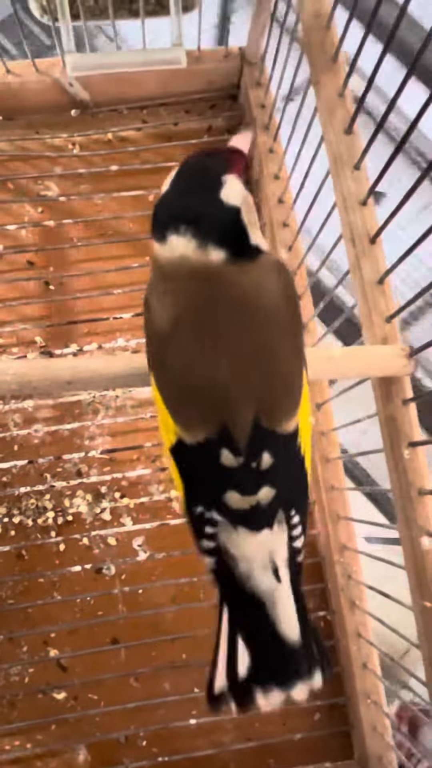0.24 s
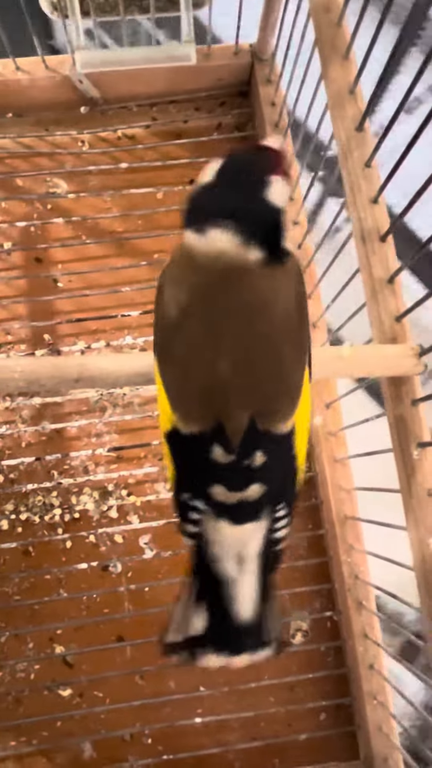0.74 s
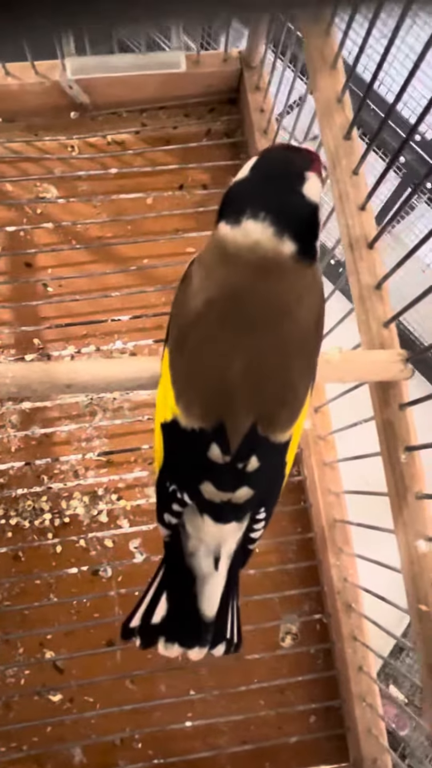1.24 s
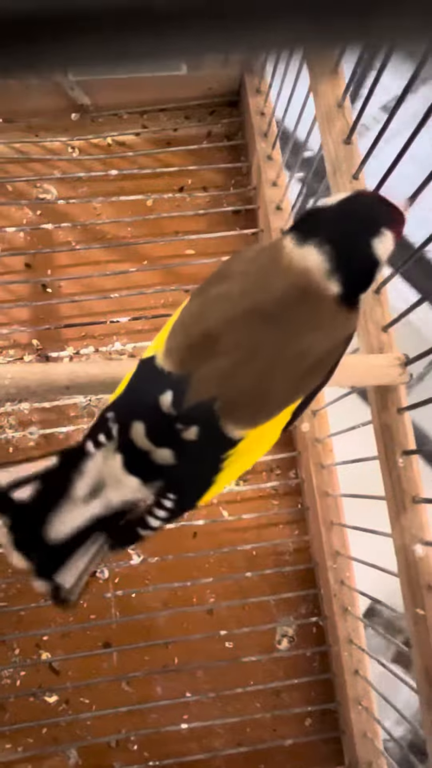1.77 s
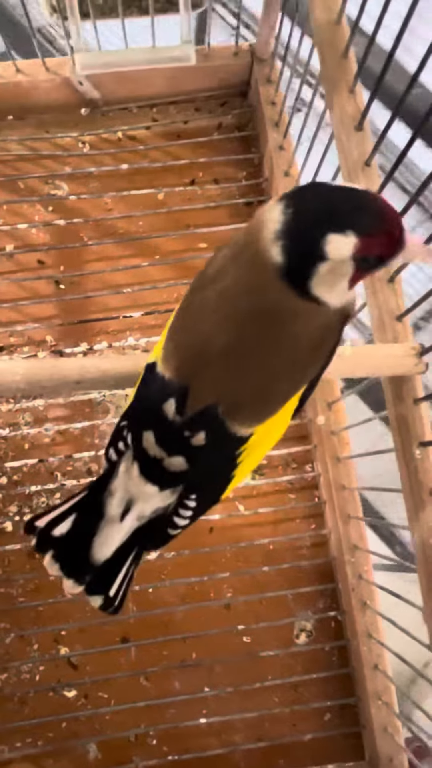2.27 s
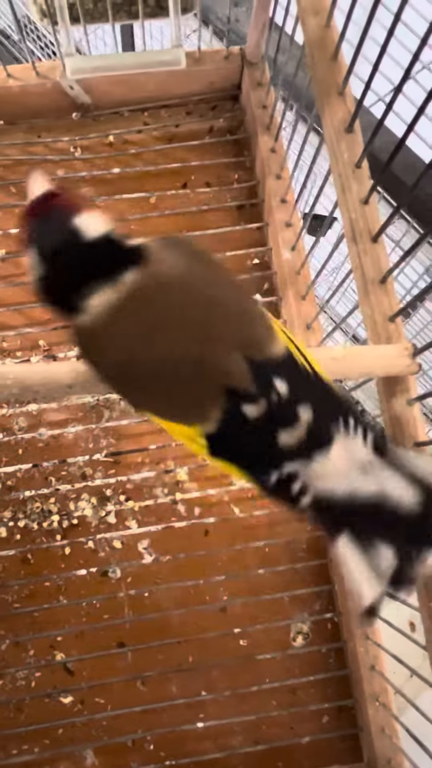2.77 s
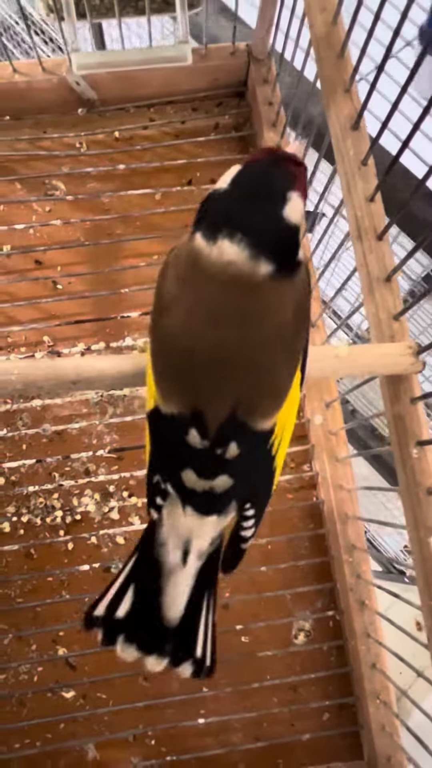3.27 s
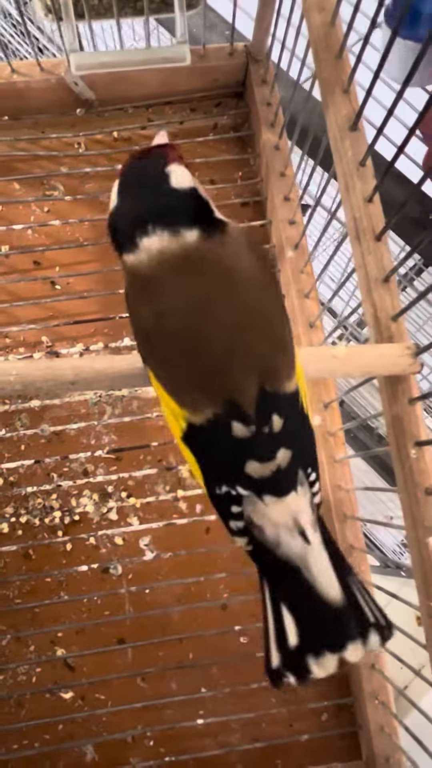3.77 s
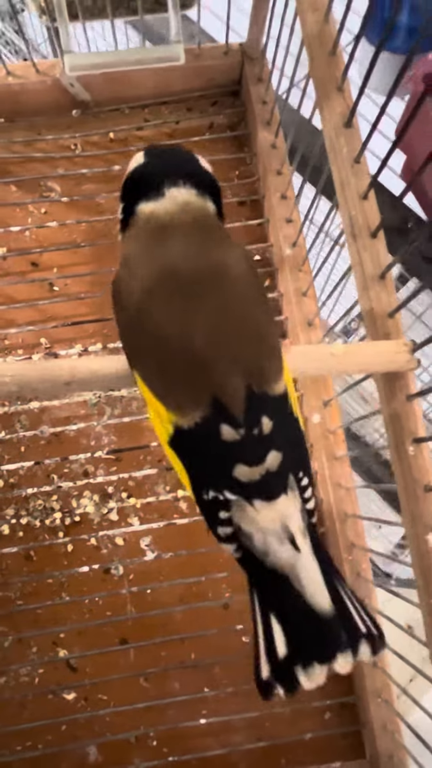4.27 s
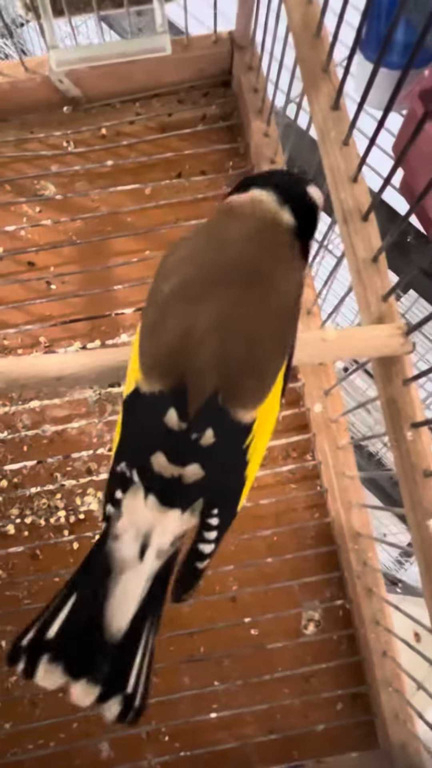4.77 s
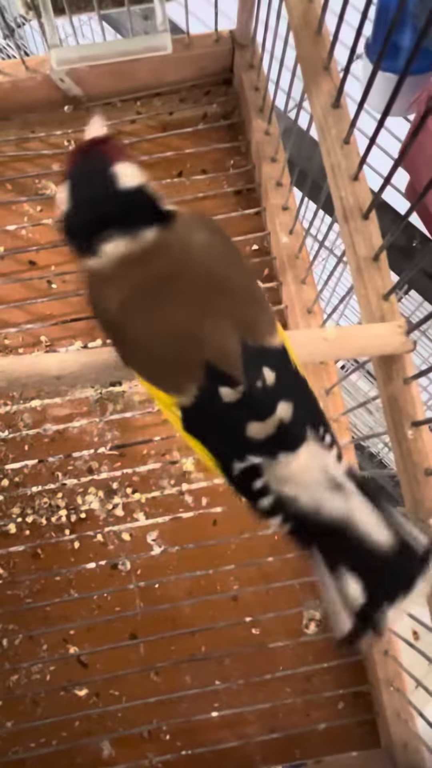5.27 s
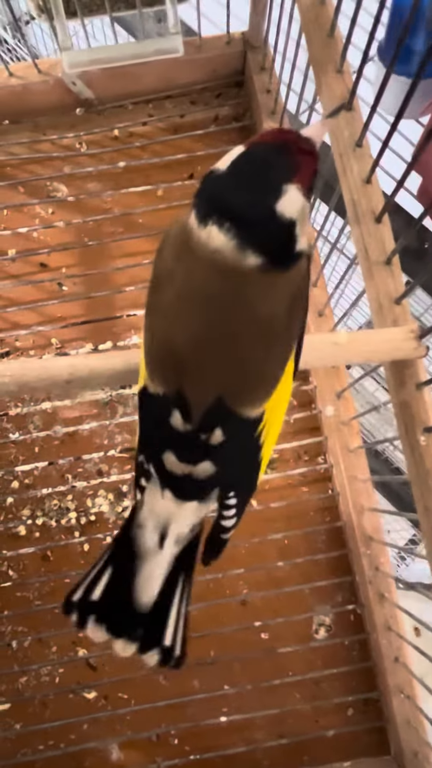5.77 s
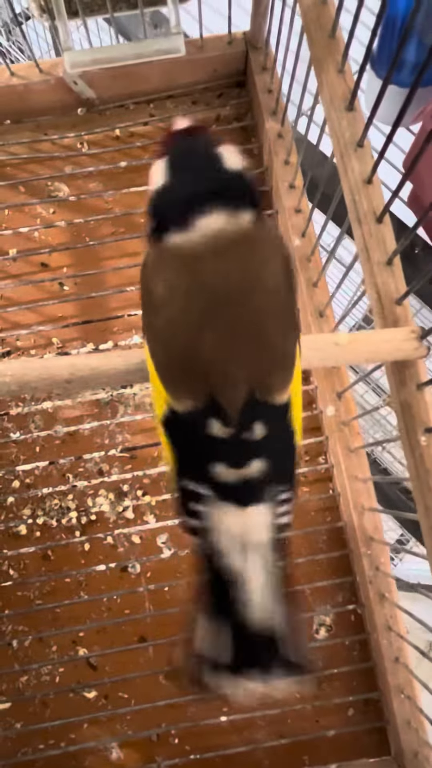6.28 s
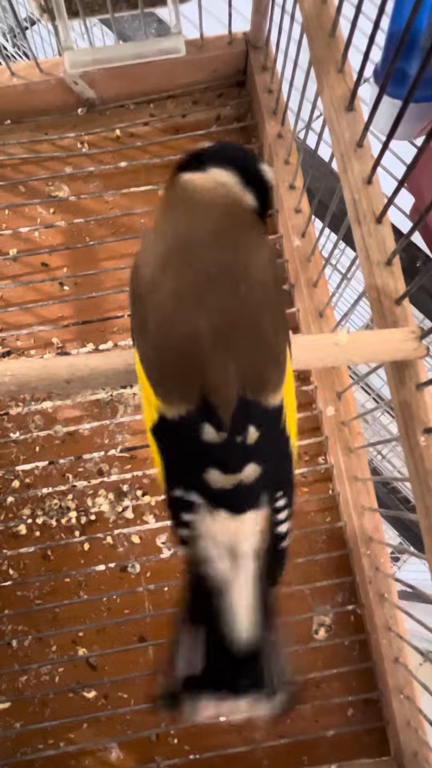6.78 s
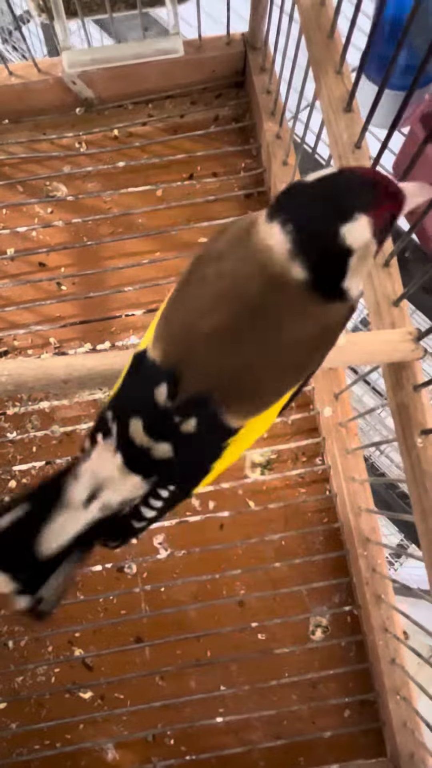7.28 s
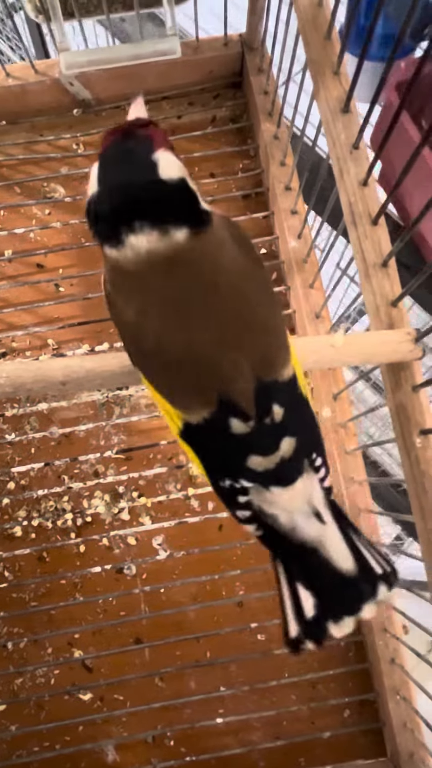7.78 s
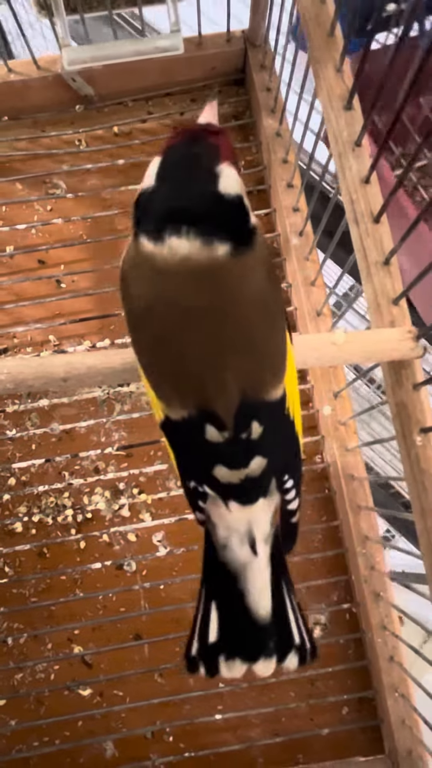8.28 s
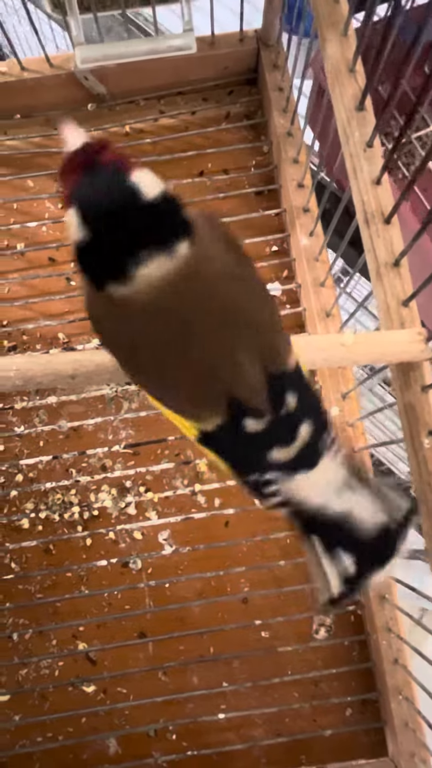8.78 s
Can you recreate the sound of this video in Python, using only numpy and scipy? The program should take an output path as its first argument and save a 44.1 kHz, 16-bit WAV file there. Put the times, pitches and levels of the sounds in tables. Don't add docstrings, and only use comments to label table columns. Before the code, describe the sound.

Near stereo phone pickup of a caged songbird: rapid rising and falling chirps first, then five separate calls, each two clicks, a buzzy rasp and a held pure whistle. Distant finches answer constantly with washed-out chirps, a warble, a fast trill and a fading rattle mid-way. The cage knocks dully a few times; low rumble and faint motor hum continue underneath.

```python
import sys
import numpy as np
from scipy import signal
from scipy.fft import rfft, irfft, next_fast_len
from scipy.io import wavfile
from scipy.ndimage import uniform_filter1d, map_coordinates

SR = 44100
rng = np.random.default_rng(int(sys.argv[2]) if len(sys.argv) > 2 else 0)


def transcribe(signal):
    frames = np.atleast_2d(signal).T
    limited = np.clip(frames, -1, 1)
    pcm = np.round(limited * 32767).astype(np.int16)
    wavfile.write(sys.argv[1], SR, pcm)


def volts_from_decibels(level):
    exponent = np.asarray(level, float) / 20
    return 10 ** exponent


N = 397782
T = np.arange(N) / SR
SIZE = next_fast_len(N + SR // 10)
HZ = np.fft.rfftfreq(SIZE, 1 / SR)


def shaped(x, gain):
    return irfft(rfft(x, SIZE) * gain, SIZE)[..., :N]


def over_hz(table):
    hz, value = np.transpose(table)
    return np.interp(np.log(HZ + 1), np.log(hz), value)


def over_time(table):
    return np.interp(T, *np.transpose(table))


def add(out, t0_s, x):
    i = int(t0_s * SR)
    x = x[max(-i, 0):N - i]
    start = max(i, 0)
    out[start:start + len(x)] += x


# f/Hz, density/dB per Hz
RUMBLE_SPECTRUM = [(18, -49), (30, -8.5), (54, -1), (86, 1.5), (258, -15), (312, -9.5), (365, -15.5),
                   (574, -19), (826, -19.5), (1900, -28.5), (2470, -44), (4180, -120)]
# f/Hz, likeness/0-1
RUMBLE_LIKENESS = [(40, 1), (70, 1), (130, 0.97), (290, 0.94), (640, .3), (1400, 0.7)]
# t/s, level/dB
ROOM_LEVEL = [(0, -47.5), (.9, -61.5), (1.5, -57.5), (1.55, -68.5), (1.83, -61.5), (1.88, -52),
              (2.6, -58.5), (3.2, -60), (5.2, -62.5), (5.5, -64.5), (6.3, -61.5), (6.4, -56.5),
              (7.4, -53.5), (7.46, -66), (7.7, -62.5), (7.9, -55), (8.2, -58), (9.02, -58)]
# t/s, half length/s, level/dB
SWELLS = [
    (1.68, 0.145, -11.5),
    (7.95, 0.27, 9),
    (5.95, 0.48, 6.5),
]


def rumble():
    like = over_hz(RUMBLE_LIKENESS)
    spectrum = volts_from_decibels(over_hz(RUMBLE_SPECTRUM)) * (HZ > 28)
    mid = shaped(rng.standard_normal(N), spectrum * np.sqrt(1 + like))
    side = shaped(rng.standard_normal(N), spectrum * np.sqrt(1 - like))
    pair = np.array([mid + side, mid - side])
    low = shaped(pair, 1 / (1 + (HZ / 170) ** 4))
    high = pair - low
    high_db = over_time(ROOM_LEVEL)
    low_db = -57.5 + 0.59 * (high_db + 62)
    for t0_s, half_s, db in SWELLS:
        low_db = low_db + db * np.exp(-((T - t0_s) / half_s) ** 4)
    return low / np.std(low) * volts_from_decibels(low_db) + high / np.std(high) * volts_from_decibels(high_db)


# t/s, level/dB
MOTOR_LEVEL = [(0, -49.5), (1.5, -52), (1.6, -72), (9.02, -61)]
# f/Hz, level/dB
HUM_LINES = [(38, -58), (216, -67.5), (312, -70), (430, -71)]


def motor():
    out = volts_from_decibels(over_time(MOTOR_LEVEL)) * np.sin(2 * np.pi * 87.5 * T)
    for hz, db in HUM_LINES:
        sway_db = 2.3 * np.interp(T, np.linspace(0, N / SR, 16), rng.standard_normal(16))
        out = out + volts_from_decibels(db + sway_db) * np.sin(2 * np.pi * hz * T)
    return out * volts_from_decibels([[-1.5], [1.5]])


def hum():
    return rumble() + motor() + volts_from_decibels(-90) * rng.standard_normal((2, N))


# t/s, crack level/dB, crack f/Hz, thud level/dB
KNOCKS = [
    (0.577, -69, 204, -48.5),
    (4.349, -57, 686, -54),
    (5.658, -44, 540, -35),
    (5.925, -51, 533, -74),
    (6.142, -62.5, 876, -65),
    (7.873, -44.5, 540, -53),
]


def knocks():
    out = np.zeros(N)
    t = np.arange(int(.15 * SR)) / SR
    thud = np.sin(2 * np.pi * 66 * t) * (t / 0.0045) * np.exp(1 - t / 0.011)
    for t0_s, crack_db, crack_hz, thud_db in KNOCKS:
        band = signal.butter(2, [.5 * crack_hz, 1.5 * crack_hz], "bandpass", fs=SR, output="sos")
        crack = signal.sosfilt(band, rng.standard_normal(len(t)) * np.exp(-t / 0.0052))
        add(out, t0_s, volts_from_decibels(crack_db + 21) * crack)
        add(out, t0_s + 0.0097, volts_from_decibels(thud_db) * thud)
    return out


def sing(hz, gain, overtones_db, rough):
    flutter = rng.standard_normal((2, len(hz)))
    flutter = uniform_filter1d(uniform_filter1d(flutter, size=40), size=40) * np.sqrt(60)
    phase = 2 * np.pi * np.cumsum(hz * (1 + 0.22 * rough * flutter[0])) / SR
    tone = 0
    for k, db in enumerate(overtones_db, start=1):
        tone = tone + volts_from_decibels(db) * np.sin(k * phase) * (k * hz < .45 * SR)
    return np.sqrt(2) * gain * (1 + rough * flutter[1]) * tone


def glide(out, t0_s, length_s, pitches_hz, db, overtones_db, rough, swell):
    u = np.linspace(0, 1, int(length_s * SR))
    hz = np.interp(u, np.linspace(0, 1, len(pitches_hz)), pitches_hz)
    add(out, t0_s, sing(hz, volts_from_decibels(db) * np.abs(np.sin(np.pi * u)) ** swell, overtones_db, rough))


# f/Hz, T60/s
ROOM_T60 = [(500, 1.6), (3000, 1.5), (5000, 0.95), (8000, 1.15), (13000, 5.2)]


def echoes(build_s):
    t = np.arange(int(1.6 * SR)) / SR
    hz, t60_s = np.transpose(ROOM_T60)
    out = 0
    for centre in 700 * 2 ** np.arange(0, 4.6, .5):
        band = signal.butter(2, [centre / 2 ** .25, centre * 2 ** .25], "bandpass", fs=SR, output="sos")
        decay = volts_from_decibels(-60 * t / np.interp(centre, hz, t60_s))
        noise = signal.sosfilt(band, rng.standard_normal((2, len(t))))
        out = out + noise * decay / np.sqrt(centre * np.mean(decay ** 2))
    lumps = np.repeat(rng.exponential(size=(2, len(t) // 128 + 1)), 128, axis=1)[:, :len(t)]
    lumps = uniform_filter1d(lumps, size=128)
    out = out * (1 - np.exp(-t / build_s)) * (1 + 0.6 * lumps * np.exp(-t / 0.082))
    return out / np.sqrt(np.mean(np.sum(out ** 2, axis=1))) * 0.34


def in_room(x, response):
    return signal.oaconvolve(x[None], response, axes=1)[:, :N]


FAR_OVERTONES_DB = [-1, -26, -28]


def far_note(cage, t0_s, length_s, pitches_hz, db):
    glide(cage, t0_s, length_s, pitches_hz, db, FAR_OVERTONES_DB, rough=.04, swell=.8)


# t/s, level/dB
CHATTER = [(0, -51), (.3, -75.5), (1.9, -66.5), (2.6, -67), (2.85, -59), (3.6, -52), (4.2, -61.5),
           (5.2, -51.5), (5.7, -54.5), (6.1, -70), (6.55, -54), (7, -58), (7.35, -60), (7.6, -59.5),
           (8.3, -55.5), (9.02, -64.5)]


def chatter(cage):
    for t0_s, chance in zip(np.arange(0, N / SR, 1 / 32), rng.random((288, 3))):
        hz = 2250 + 800 * chance[0] ** .5
        pitches_hz = [hz, hz * (0.98 + 0.14 * chance[1])]
        db = np.interp(t0_s + 0.22, *np.transpose(CHATTER)) + 20.5 + 4 * chance[2]
        glide(cage, t0_s, 0.023, pitches_hz, db, FAR_OVERTONES_DB, rough=0.22, swell=0.62)


# t/s into the motif, length/s, start f/Hz, end f/Hz, level/dB
WARBLE = [(0, 0.063, 4360, 5380, -40.5), (.012, .012, 4200, 4400, -37.5), (.035, 0.021, 5800, 5410, -45),
          (.042, 0.018, 6480, 6610, -38), (.069, 0.039, 4550, 3555, -42), (.114, .025, 4600, 4276, -37),
          (.14, .04, 3600, 2800, -45), (.164, 0.0095, 4420, 4420, -35.5), (.174, 0.031, 3200, 4280, -52.5)]
TRILL = [
    (0.0025, 0.024, 4300, 5350, -39),
    (0.039, 0.018, 4750, 6080, -38),
    (0.087, .016, 4056, 3400, -40.5),
    (0.053, .012, 5600, 4900, -43.5),
]
RATTLE = [
    (0, 0.016, 4894, 4137, -38),
    (.03, 0.029, 5610, 4660, -49),
]
FLOURISH = [
    (0, 0.0056, 7000, 5860, -39),
    (.012, 0.021, 5720, 4520, -38),
    (.035, .028, 3460, 2930, -46),
]
# motif, repeats, first t/s, period/s, level change/dB per repeat
SONG = [
    (WARBLE, dict(count=3), 3.085, .199, 0.067),
    (TRILL, dict(count=8), 3.68, .097, 0.14),
    (RATTLE, dict(count=9), 4.49, 0.066, -0.32),
    (FLOURISH, dict(count=2), 8.378, 0.14, -0.12),
]


def neighbour_song(cage):
    for motif, repeats, first_s, period_s, fade_db in SONG:
        for k in range(repeats["count"]):
            for s, length_s, hz0, hz1, db in motif:
                level_chance, pitch_chance = rng.standard_normal(2)
                db = db + k * fade_db + .7 * level_chance + 26
                pitches_hz = np.array([hz0, hz1]) * (1 + .008 * pitch_chance)
                far_note(cage, first_s + k * period_s + s, length_s, pitches_hz, db)


# t/s, start f/Hz, end f/Hz, level/dB
LOW_CALLS = [(0.856, 2680, 2670, -65.5), (0.989, 3150, 3100, -62.5), (1.316, 2938, 3700, -46),
             (1.938, 3320, 3310, -42), (1.952, 3430, 2890, -50), (2.098, 3753, 3196, -43.5),
             (2.222, 2686, 3600, -47.5), (2.239, 3315, 3230, -42.5), (2.734, 3475, 3240, -45),
             (2.961, 3960, 3230, -45), (3.032, 3284, 2770, -52), (3.872, 3570, 2780, -43),
             (3.76, 3703, 3930, -45), (2.78, 2630, 1816, -61), (4.195, 2090, 3350, -67),
             (4.34, 3180, 4470, -47.5), (4.442, 3456, 2530, -49), (4.775, 3300, 3150, -51),
             (4.838, 3990, 3340, -48), (5.429, 3427, 2740, -50.5), (5.629, 3660, 2930, -57),
             (6.176, 3280, 2880, -57), (6.532, 3474, 2670, -55), (6.632, 2560, 3880, -46),
             (7.593, 3870, 3005, -47.5), (8.035, 2680, 3950, -48), (8.274, 3162, 2350, -49),
             (8.376, 4160, 2790, -50.5), (8.55, 3063, 2420, -51.5)]
HIGH_CALLS = [(0, 6010, 4880, -44), (.454, 5214, 4870, -40), (1.494, 4670, 5200, -48),
              (1.671, 5430, 5060, -61.5), (1.886, 5790, 4890, -42), (2.156, 4700, 5086, -39),
              (2.875, 6260, 4700, -44.5), (2.885, 5900, 6450, -49.5), (3.67, 6620, 6700, -73),
              (3.939, 6420, 6170, -55), (4.246, 7900, 6280, -55.5), (4.262, 6510, 6000, -50.5),
              (4.535, 6790, 6100, -50.5), (4.587, 7090, 6760, -53.5), (5.254, 6390, 6600, -48),
              (5.337, 8500, 6970, -55.5), (5.351, 5990, 4280, -45), (5.373, 7050, 6230, -52.5),
              (5.688, 6060, 5330, -52), (5.7, 5480, 5130, -47), (6.028, 6310, 5830, -47.5),
              (6.415, 6915, 6540, -48.5), (6.789, 5910, 4660, -64), (7.131, 4580, 6060, -39.5),
              (7.177, 6230, 5350, -48.5), (7.539, 4970, 5530, -55.5), (7.655, 5660, 5270, -45.5),
              (8.201, 5510, 7280, -60.5), (8.365, 7950, 6800, -54)]
MIDDLE_CALLS = [(0, 3736, 5670, -39.5), (.422, 4605, 4960, -39), (1.075, 4016, 4640, -50),
                (1.703, 3700, 4340, -44.5), (1.805, 4733, 4184, -42.5), (1.853, 3623, 4700, -41.5),
                (1.902, 4630, 4020, -46.5), (2.13, 3820, 4220, -42), (3.024, 3830, 4320, -52),
                (3.942, 3430, 5050, -39.5), (4.99, 4154, 4440, -41), (5.751, 4136, 3950, -46.5),
                (5.764, 4200, 4880, -43), (5.791, 4510, 4740, -55), (5.985, 3943, 4630, -46),
                (6.084, 4990, 4610, -39.5), (6.093, 3940, 4580, -50.5), (6.303, 4500, 3560, -44.5),
                (6.323, 3230, 4290, -45.5), (6.425, 4115, 3020, -47.5), (6.529, 4405, 3740, -47.5),
                (7.114, 4313, 4460, -40.5), (7.686, 5040, 4525, -41.5), (7.739, 3810, 3896, -41.5),
                (7.86, 3110, 4270, -46.5), (8.059, 3296, 4310, -49.5), (8.177, 4235, 3330, -46.5),
                (8.239, 4830, 4190, -39), (8.393, 3840, 4550, -46.5)]


def lone_calls(cages):
    for cage, calls in zip(cages, (LOW_CALLS, HIGH_CALLS, MIDDLE_CALLS)):
        for t0_s, hz0, hz1, db in calls:
            length_s = .012 + abs(hz1 - hz0) / 70000
            effort_db = 10 * np.log10(0.021 / length_s)
            far_note(cage, t0_s, length_s, [hz0, hz1], db + effort_db + 29)


# t/s, length/s, start f/Hz, end f/Hz, level/dB
OTHER_CALLS = [
    (1.96, .085, 3200, 1980, -50),
    (6.53, 0.062, 3700, 1950, -51),
    (7.04, .06, 3300, 3290, -63),
    (2.27, 0.042, 3350, 3200, -47.5),
    (2.9, .012, 5600, 3900, -46),
    (6.9, 0.011, 3500, 4600, -56.5),
    (2.138, 0.019, 4500, 5700, -46),
    (8.875, .03, 6300, 4600, -51.5),
    (2.5, 0.027, 3800, 4100, -45.5),
    (1.58, 0.039, 4800, 3000, -52),
]


def other_calls(cage):
    for t0_s, length_s, hz0, hz1, db in OTHER_CALLS:
        far_note(cage, t0_s, length_s, [hz0, hz1], db + 26.5)


def far_birds():
    cages = np.zeros((4, N))
    chatter(cages[3])
    neighbour_song(cages[0])
    lone_calls(cages[:3])
    other_calls(cages[3])
    out = sum(in_room(cage, echoes(build_s=0.005)) for cage in cages)
    return shaped(out, 1 / (1 + (HZ / 14500) ** 20))


NEAR_OVERTONES_DB = [-0.5, -24, -30, -34.5, -41]
# t/s, length/s, start f/Hz, end f/Hz, level/dB
CHIRPS = [
    (-.006, 0.028, 2530, 3460, -16),
    (0.063, 0.022, 4620, 2747, -11.5),
    (0.082, 0.032, 2718, 4745, -11.5),
    (0.196, 0.019, 2660, 3320, -15.5),
    (0.252, 0.021, 3440, 4284, -12),
    (0.366, .022, 2634, 3356, -18.5),
    (0.42, .022, 3605, 4304, -12.5),
    (3.904, 0.027, 1913, 3710, -22),
    (3.98, 0.0082, 3770, 2970, -9.5),
    (3.991, 0.035, 3010, 4450, -15),
]


def chirps(voice):
    for t0_s, length_s, hz0, hz1, db in CHIRPS:
        pitches_hz = [hz0, hz0 + 0.63 * (hz1 - hz0), hz1]
        glide(voice, t0_s, length_s, pitches_hz, db, NEAR_OVERTONES_DB, rough=.06, swell=1.3)


def syllable(out, t0_s, db, shape, overtones_db, rough):
    s, hz, level_db = np.transpose(shape)
    t = np.arange(s[0], s[-1], 1 / SR)
    gain = volts_from_decibels(db + np.interp(t, s, level_db)) * signal.windows.tukey(len(t), .1)
    add(out, t0_s + s[0], sing(np.interp(t, s, hz), gain, overtones_db, rough))


# t/s after the call starts, f/Hz, level/dB
TICKS = [
    [(-.005, 2868, -25.5), (0, 3164, -5.5), (.007, 3490, 1.5), (.0105, 3850, -8.5), (.013, 3897, 3),
     (.019, 4190, 4), (.023, 4260, -28.5)],
    [(.021, 3390, -31), (.025, 3700, -2.5), (.029, 4020, 5), (.034, 4250, -2.5), (.040, 4270, -25)],
]
RASP = [
    [(.078, 3000, -23), (.082, 3160, -12), (.088, 3280, -3), (.095, 3440, -24.5)],
    [(.092, 3076, -16.5), (.097, 3210, -10.5), (.105, 3420, -0.5), (.108, 3400, -1), (.111, 3500, -47)],
]
RASP_OVERTONES_DB = [
    [-1, -2, -25.5, -20, -34.5],
    [0.5, -25.5, -31, -27.5, -41],
]
# t/s, first tick/dB, second tick/dB, rasp opening/dB, rasp end/dB
CALL_TIMES = [
    (1.367, -13.5, -15, -14.5, -9.5),
    (2.569, -15, -19.5, -18, -14),
    (5.085, -20, -20.5, -15.5, -22.5),
    (7.258, -14, -12.5, -15, -15.5),
    (8.663, -15, -13.5, -12, -19.5),
]
# t/s, f/Hz, level/dB
WHISTLES = [
    [(1.494, 4095, -32), (1.502, 4310, -18.5), (1.518, 4395, -16), (1.54, 4462, -16), (1.606, 4483, -19),
     (1.652, 4496, -24), (1.66, 4477, -27.5)],
    [(2.7, 4223, -34), (2.722, 4327, -21), (2.746, 4422, -17), (2.762, 4446, -21), (2.81, 4458, -22),
     (2.82, 4472, -25), (2.852, 4455, -21.5), (2.872, 4450, -33.5)],
    [(5.215, 4484, -28), (5.223, 4326, -35.5), (5.257, 4432, -14), (5.309, 4459, -20.5),
     (5.371, 4439, -24.5), (5.385, 4426, -46)],
    [(7.388, 3960, -37), (7.396, 4313, -33), (7.412, 4364, -20.5), (7.452, 4455, -19.5), (7.538, 4455, -25),
     (7.553, 4444, -37.5)],
    [(8.8, 4284, -37), (8.828, 4393, -20.5), (8.866, 4456, -8), (8.944, 4454, -19.5), (8.958, 4525, -34)],
]
WHISTLE_DB = [3, 3.6, 4.8, 4.7, 1.1]
WHISTLE_OVERTONES_DB = [0.5, -33, -27]


def calls(voice):
    beak = signal.butter(1, [5400, 8000], "bandpass", fs=SR, output="sos")
    swell = np.hanning(int(.02 * SR))
    for call, whistle, whistle_db in zip(CALL_TIMES, WHISTLES, WHISTLE_DB):
        t0_s, first_db, second_db, rasp_db, end_db = call
        for shape, db in zip(TICKS, (first_db, second_db)):
            syllable(voice, t0_s, db, shape, NEAR_OVERTONES_DB, rough=.05)
        for shape, db, overtones_db in zip(RASP, (rasp_db, end_db), RASP_OVERTONES_DB):
            syllable(voice, t0_s, db, shape, overtones_db, rough=0.083)
        syllable(voice, 0, whistle_db, whistle, WHISTLE_OVERTONES_DB, rough=0.011)
        puff = swell * signal.sosfilt(beak, rng.standard_normal(len(swell)))
        add(voice, t0_s + 0.083, volts_from_decibels(rasp_db - 8.5) * puff)


def cage_echoes():
    taps = np.arange(1300)
    hits = rng.standard_normal((2, 1300)) * (rng.random((2, 1300)) < .02)
    hits = hits * np.exp(-taps / (0.0078 * SR)) * (taps > 60)
    return hits / np.sqrt(np.sum(hits ** 2, axis=1, keepdims=True))


# t/s, left minus right/dB, left port lead/ms
LEFT_RIGHT = [(0, 2, 0), (.07, -3, .12), (.1, -3, .075), (.2, 0, 0), (.26, 1, .06), (.38, 2, 0), (.43, 0, .065),
              (1.39, -3, .08), (1.47, -6, .13), (1.52, -7, .07), (1.56, -9, .07), (1.63, -3, .06),
              (2.59, -1.5, .065), (2.67, -9, .13), (2.73, 1, .1), (2.81, 9, .1), (2.86, 7, .13), (3.92, -3, .14),
              (4.01, -3, .13), (5.1, 1.5, .085), (5.26, -3, .08), (5.35, -6, .1), (7.28, -2, .07),
              (7.36, -5, .13), (7.42, -11, .09), (7.46, -8, .07), (7.52, -15, .1), (8.68, -.5, .078),
              (8.83, 2, .066), (8.87, 1, .058), (8.93, 0, .058)]
# t/s, level/dB
TO_WALLS = [(.2, -4.5), (1.4, 7.5), (1.6, 2.5), (2.6, -4.5), (2.8, -3), (4, 0.5), (5.1, 3.5), (5.3, -4.5),
            (7.3, 0.5), (7.5, 0), (8.7, -4), (8.9, 1)]


def near_bird():
    voice = np.zeros(N)
    calls(voice)
    chirps(voice)
    s, pan_db, lead_ms = np.transpose(LEFT_RIGHT)
    pan_db = np.interp(T, s, pan_db)
    lead_s = np.interp(T, s, lead_ms) / 1000
    early = map_coordinates(voice, [(T + lead_s) * SR], order=3)
    direct = np.array([early * volts_from_decibels(pan_db / 2), voice * volts_from_decibels(-pan_db / 2)])
    room = echoes(build_s=0.0065)
    sent = voice * volts_from_decibels(over_time(TO_WALLS))
    turn = 2 * np.pi * .6 * T
    walls = in_room(sent * np.cos(turn), room) + in_room(sent * np.sin(turn), room[::-1])
    return direct + volts_from_decibels(-9.5) * in_room(voice, cage_echoes()) + volts_from_decibels(-4.5) * walls


def scene():
    return hum() + knocks() + far_birds() + near_bird()


def masked(x):
    hz, _, z = signal.stft(x, SR, nperseg=1024)
    bands = z[:512].reshape(64, 8, -1)
    power = uniform_filter1d(np.mean(np.abs(bands) ** 2, axis=1), size=3)
    level_db = 10 * np.log10(power + 1e-18)
    octaves = np.log2(hz[4:512:8] / 4600)[:, None]
    scatter_db = uniform_filter1d(rng.standard_normal(level_db.shape), size=4) * 7
    limit_db = level_db.max(axis=0) - 26 - 16.5 * octaves + scatter_db
    keep = np.where(octaves > 0, np.clip((level_db - limit_db) / 2 + .5, 0, 1), 1)
    kept = (bands * keep[:, None]).reshape(512, -1)
    return signal.istft(np.vstack([kept, z[512:]]), SR, nperseg=1024)[1][:N]


def low_pass(x):
    return signal.sosfilt(signal.butter(12, 15810, fs=SR, output="sos"), x)


# f/Hz, level/dB
MICROPHONE = [(5500, -0.5), (7500, -2.5), (10000, -6), (12000, 1.5), (13800, -6), (14800, -13.5),
              (15400, -3.5)]
# f/Hz, difference minus sum/dB
BAND_LEAN = [(2900, 2.5), (3400, 5.5), (3850, -2.5), (6800, 5.5), (7000, -14.5), (8900, -4), (9500, 8),
             (11000, 8.5), (11300, -14.5), (13500, 2.5), (13900, 3), (15000, 8), (15300, -5)]


def record(dry):
    dry = shaped(dry, volts_from_decibels(over_hz(MICROPHONE)))
    lean_db = over_hz(BAND_LEAN)
    mid = masked(shaped(dry[0] + dry[1], volts_from_decibels(np.minimum(-lean_db, 0))) / 2)
    side = masked(shaped(dry[0] - dry[1], volts_from_decibels(np.minimum(lean_db, 0))) / 2)
    return low_pass(np.array([mid + side, mid - side]))


dry = scene()
out = record(dry)
transcribe(out)
```